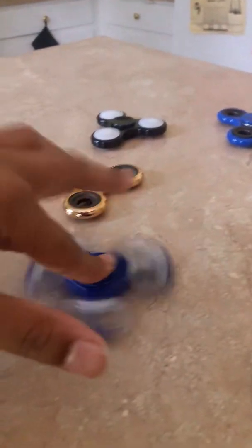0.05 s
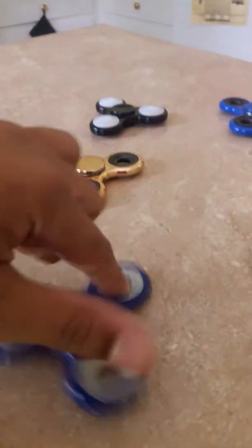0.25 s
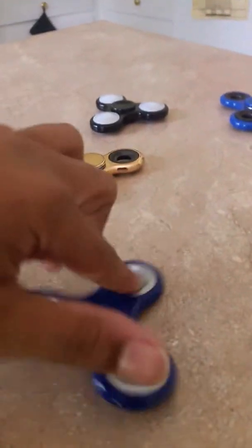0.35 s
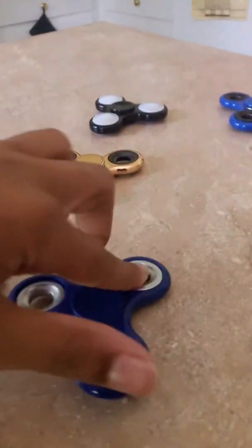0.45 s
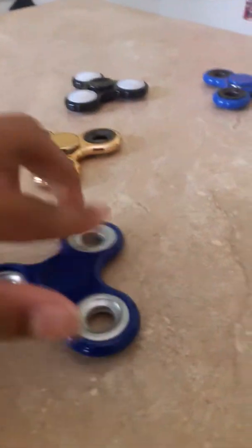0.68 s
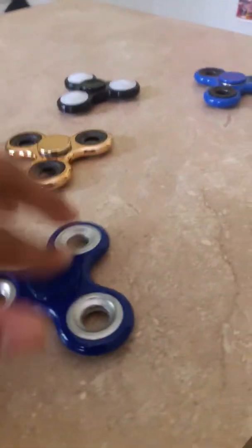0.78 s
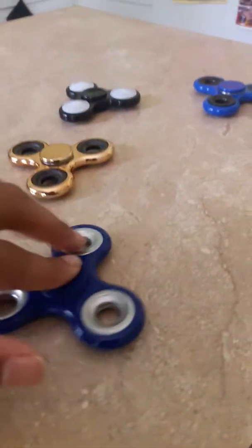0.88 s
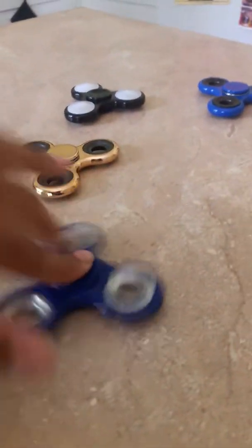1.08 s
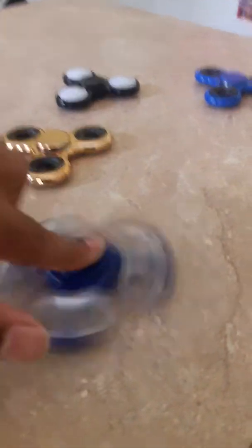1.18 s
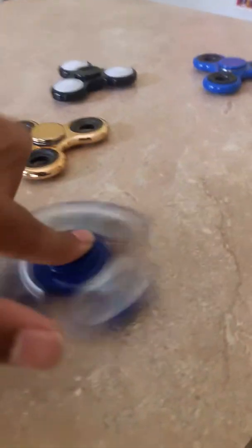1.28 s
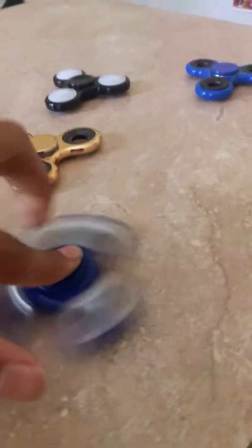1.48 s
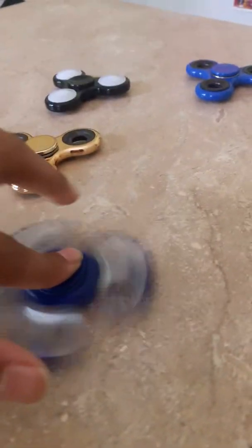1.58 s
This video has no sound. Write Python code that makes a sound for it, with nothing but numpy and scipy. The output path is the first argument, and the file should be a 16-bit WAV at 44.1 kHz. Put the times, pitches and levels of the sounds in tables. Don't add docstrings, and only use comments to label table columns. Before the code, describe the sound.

Close phone pickup in a small hard room: soft bearing whirr and table hum, a fast cluster of hard plastic and metal clacks, brief scrape, faint finger taps, near silence, then a quieter flick and renewed spinning.

```python
import sys
import numpy as np
from scipy import signal
from scipy.fft import rfft, irfft
from scipy.io import wavfile
from scipy.ndimage import uniform_filter1d

SR = 44100
rng = np.random.default_rng(int(sys.argv[2]) if len(sys.argv) > 2 else 0)


def output_pcm(signal):
    pcm = np.clip(np.atleast_2d(signal).T, -1, 1) * 32767
    wavfile.write(sys.argv[1], SR, np.round(pcm).astype(np.int16))


def invert_db(level):
    return 10 ** (np.asarray(level, dtype=float) / 20)


N = 72765

# start in seconds, plastic level in dB, table level in dB, steel level in dB,
# favoured mode in Hz.
STOP_CONTACTS = [(0.119, -43, -30.5, -41, 1000), (0.167, -35, -30.5, -48.5, 500),
                 (0.1772, -47.5, -44, -33.5, 450), (0.196, -31, -33, -55, 420),
                 (0.2057, -7, -27, -21.5, 1000), (0.2073, -9, -34.5, -19.5, 600),
                 (0.216, -18.5, -40, -30, 650), (0.224, -18, -43.5, -34.5, 600),
                 (0.236, -18, -50, -35, 450), (.247, -12, -18.5, -29.5, 500),
                 (0.2485, -16.5, -36.5, -23.5, 560), (0.253, -14.5, -30, -18, 2300),
                 (0.261, -14.5, -30.5, -26.5, 950), (0.2683, -7.5, -32.5, -21, 2300),
                 (0.2703, -17, -11.5, -10.5, 410), (0.276, -21, -29, -28, 1080),
                 (0.281, -21.5, -31.5, -28, 410), (0.288, -19, -23, -29, 410),
                 (0.295, -18, -12.5, -40.5, 2800), (.301, -35, -22, -46.5, 410),
                 (0.329, -28.5, -34.5, -32, 400), (0.346, -26.5, -39.5, -29, 900),
                 (0.445, -47, -47, -61, 1000), (0.479, -53, -69, -62, 2800)]
# start in seconds, plastic level in dB, table level in dB,
# steel level in dB, favoured mode in Hz.
FLICK_CONTACTS = [(0.6062, -41.5, -65, -74.5, 1067), (0.606, -36.5, -56, -79, 589.8),
                  (0.6155, -40.5, -54, -76, 1100), (0.635, -69, -56, -53, 1090),
                  (0.645, -61, -73, -57, 450), (0.6604, -34.5, -22, -33, 2010),
                  (0.681, -44, -25.5, -44, 1090), (0.6997, -50, -60, -56, 446),
                  (0.901, -62.5, -71, -62.5, 902), (1.171, -57.5, -22, -65, 434),
                  (1.179, -56, -19.5, -70.5, 450), (1.1908, -13.5, -42, -29.5, 2016),
                  (1.192, -13.5, -53, -32.5, 663), (1.199, -18, -40, -39, 930),
                  (1.2037, -18, -57, -26, 500), (1.209, -30, -59, -44, 2140),
                  (1.224, -25.5, -58, -31, 2400), (1.238, -28, -38, -35, 447), (1.2482, -21, -27, -36, 930),
                  (1.253, -25.5, -17, -45, 820), (1.27, -45, -24, -32.5, 450), (1.289, -33, -49, -51, 447),
                  (1.32, -39, -33, -58, 450), (1.37, -63, -49, -47, 450), (1.39, -60, -31, -46, 450)]
# frequency in Hz, level in dB, T60 in seconds.
TABLE_MODES = [(120, -4.5, 0.2), (184.7, -4, 0.047), (258, -7, 0.032), (284, 0, 0.16), (337.3, 10.5, 0.022)]
# frequency in Hz, level in dB, T60 in seconds.
PLASTIC_MODES = [(440, 0, 0.16), (466, -12, 0.077), (560, -9, .05), (630, 9, 0.032), (902, 3, 0.058),
                 (1120, -3, 0.02), (1090, 0, .04), (1302, -10.5, .03), (1420, -6.5, .035),
                 (1860, 14, 0.012), (2370, 5, 0.015), (2660, 8.5, 0.026), (3380, -10, 0.078),
                 (4340, 22.5, 0.0017)]
# frequency in Hz, level in dB, T60 in seconds.
GRIPPED_MODES = [(355, -2, 0.066), (410, 1.5, 0.046), (568, -4, 0.033), (688, 2.5, 0.017), (940, -8, 0.091),
                 (1036, 0, 0.034), (1090, -4.5, 0.026), (1370, -9.5, .03), (1536, 1.5, 0.039),
                 (1992, -1, .02), (2316, 0.5, 0.031), (2888, 2.5, .02), (3560, -2, 0.021),
                 (4350, 7.5, 0.0045)]
# frequency in Hz, level in dB, T60 in seconds.
PINNED_MODES = [(452, -1, 0.073), (500, -7, 0.12), (569, -3.5, 0.041), (667.5, 3.5, 0.055),
                (790, -29, 0.036), (931, 10, 0.034), (1098, 10.5, 0.022), (1224, -2.5, 0.074),
                (1515, -1.5, 0.045), (1942, 4, 0.031), (2170, 9, 0.013), (2400, 0, 0.023),
                (2840, 15.5, 0.0051), (3640, 13, 0.0034)]
# frequency in Hz, level in dB, T60 in seconds.
STEEL_MODES = [(4300, -13, .003), (5500, -12, .003), (6750, -2, .01), (7300, 0, .012), (7800, -1, .01),
               (8600, -4, .006), (9400, -7, .004), (10300, -10, .004), (11400, -13, .004),
               (12300, -14, .004), (13100, -7, .005), (14000, -6, .004), (14800, -5, .004),
               (15500, -4, .004)]
# frequency in Hz, level in dB, T60 in seconds.
WOBBLE_MODES = [(178.7, -6.5, 0.16), (237, -14.5, 0.086), (311, -2, 0.027), (466.6, -2, 0.026),
                (546.6, -7, 0.017), (907, -3, 0.028), (1096, -7, 0.03), (1250, -15.5, 0.025),
                (1820, -14.5, 0.017)]
# frequency in Hz, level in dB, T60 in seconds.
THUMP_MODES = [(69.5, -1.5, 0.57), (90, -4, 0.14)]
# time in seconds, level in dB.
BEARING_AND_RUB = [(0, -57), (.09, -59), (.19, -57), (.3, -50), (.45, -82), (.56, -105), (.68, -67.5),
                   (.82, -99.5), (.91, -91), (.96, -76), (1.01, -77.5), (1.07, -100), (1.13, -83),
                   (1.2, -52), (1.33, -53), (1.37, -57), (1.5, -58.5), (1.65, -54)]
# time in seconds, level in dB.
DRAG_LEVEL = [(0, -54), (.204, -73.5), (.212, -28), (.243, -31.5), (.29, -23.5), (.32, -34.5), (.36, -35.5),
              (.4, -46), (.47, -47.5), (.53, -66), (.62, -66), (.7, -64.5), (.8, -77), (1.13, -85),
              (1.188, -69), (1.2, -36), (1.33, -51.5), (1.48, -65)]
# time in seconds, level in dB.
WOBBLE_LEVEL = [(0, -47), (.1, -46), (.18, -44.5), (.215, -51.5), (.45, -59), (.64, -57), (.68, -49),
                (.79, -62), (.83, -70.5), (1.14, -63), (1.17, -45.5), (1.3, -40), (1.45, -46.5),
                (1.53, -47), (1.65, -41)]
# start in seconds, level in dB, frequency in Hz.
RING_CLICKS = [(0.47, -43, 5900), (.448, -55, 5100), (.447, -55.5, 14000), (0.634, -53, 7400),
               (0.68, -56, 10000), (.6605, -50, 5300), (.682, -50, 14000), (.688, -52, 14300),
               (1.181, -55, 6000), (1.249, -44, 14200), (1.298, -35, 13000), (1.5, -39, 14300),
               (1.1945, -25, 6300), (1.311, -48, 16000)]
# start in seconds, level in dB.
HAND_THUMPS = [
    (.21, -41.5),
    (0.302, -49),
    (.35, -45.5),
    (1.225, -45.5),
]
# frequency in Hz, T60 in seconds.
ROOM_T60 = [(100, 0.28), (400, 0.31), (1000, 0.13), (3000, 0.45), (8000, 0.24), (15000, 0.15)]
# frequency in Hz, correlation from 0 to 1.
LIKENESS = [(60, .97), (300, .96), (700, .85), (1500, .6), (4000, .15)]
# frequency in Hz, level in dB.
FLOOR_SPECTRUM = [(25, -52), (60, -6.5), (150, 9), (350, -0.5), (700, -7), (1500, -15), (4000, -32),
                  (16000, -40)]

FLOOR_DB = -61.5
BODY_WET_DB, STEEL_WET_DB, ROOM_GAP_S = -9.5, -11, 0.0038
LEFT_DB, LEFT_LAG_S = 1.38, 0.00011
DETUNE, SCATTER_DB, SIDE_CHANGE = 0.0094, 1, 0.62
CLICK_T60_S, CLICK_SPREAD, THUMP_S = 0.01, 0.093, 0.0094
WOBBLE_PER_S, WOBBLE_SPREAD_DB = 700, 2.5
DRAG_PER_S, DRAG_SPREAD_DB, DRAG_DULL_HZ, DRAG_RING = 2000, 3, 4040, 0.51
RATTLE_PER_S, RATTLE_DB, RATTLE_SPREAD_DB, RATTLE_RING = 2100, -14.5, 1.6, 0.4
SLIDE_START_S, SLIDE_LENGTH_S, SLIDE_DB = 0.3956, 0.1, -45.5
BALLS_PER_S, BALL_SPREAD_DB, FLICKER_DB = 1200, 1.5, 0.8
TOP_DB, TOP_GROWTH = -4.5, 1.9
STRIKE_S, SOFTEN, THUD_S, HARD_DB = 0.0002, 0.3, 0.0015, -28
FAVOUR_DB, FAVOUR_OCTAVES = 11, 0.39
JINGLE_S, FIRST_TICK, CRACK_DB = 0.001, 10, -5
PLASTIC_HIGHPASS = signal.butter(2, 250, "high", fs=SR, output="sos")
RACE_HIGHPASS = signal.butter(4, 6000, "high", fs=SR, output="sos")


def unit_rms(x):
    return x / np.sqrt(np.mean(x ** 2) + 1e-20)


def read(points, hz):
    f, value = np.transpose(points)
    return np.interp(np.log(hz + 1), np.log(f + 1), value)


def gain_curve(points):
    s, db = np.transpose(points)
    return invert_db(np.interp(np.arange(N) / SR, s, db))


def add(mix, start_s, sound):
    part = mix[:, round(start_s * SR):][:, :sound.shape[1]]
    part += sound[:, :part.shape[1]]


def force_pulse(t, length_s):
    push = np.sin(np.pi * np.minimum(t / length_s, 1)) ** 2
    return push / push.sum()


def mode_chance():
    return rng.standard_normal((4, 14))


def ring(modes, chance, longer=1):
    t = np.arange(4000) / SR
    hz, db, t60 = np.transpose(modes)[:, :, None]
    detune, scatter, polarity, side = chance[:, :len(modes), None]
    sign = np.where(polarity + 0.6 > 0, -1, 1)
    likeness = np.clip(read(LIKENESS, hz), -1, 1)
    turn = SIDE_CHANGE * np.pi * np.sqrt(1 - likeness ** 2) * side
    fade = sign * invert_db(db + SCATTER_DB * scatter - 60 * t / (t60 * longer))
    angle = 2 * np.pi * hz * (1 + DETUNE * detune) * t
    onset = np.minimum(t * hz * 2, 1)
    left = (fade * np.sin(angle)).sum(0)
    right = (fade * np.sin(angle + turn * onset)).sum(0)
    taper = np.cos(t / t[-1] * np.pi / 2)
    return np.array([left, right]) * taper / np.sqrt((invert_db(db) ** 2).sum())


def grains(modes, per_s, spread_db, longer=1):
    size = invert_db(spread_db * np.minimum(rng.exponential(1, N), 5))
    size = size * (rng.random(N) < per_s / SR) * rng.choice([-1, 1], N)
    version = rng.integers(0, 4, N)
    out = np.zeros((2, N))
    for k in range(4):
        ticks = (size * (version == k))[None]
        out += signal.oaconvolve(ticks, ring(modes, mode_chance(), longer))[:, :N]
    return unit_rms(out)


def noise_spectra(size):
    hz = np.fft.rfftfreq(512, 1 / SR)
    a, b, c, d = rng.standard_normal((size // 128 + 5, 257, 4)).T
    same = np.clip(read(LIKENESS, hz), -1, 1)[:, None]
    left = a + 1j * b
    right = same * left + np.sqrt(1 - same ** 2) * (c + 1j * d)
    return hz, np.array([left, right])


def floor():
    hz, z = noise_spectra(N)
    shaped = z * invert_db(read(FLOOR_SPECTRUM, hz))[:, None]
    noise = signal.istft(shaped, nperseg=512, noverlap=384)[1][:, :N]
    return invert_db(FLOOR_DB) * unit_rms(noise)


def room(x):
    hz, z = noise_spectra(SR)
    t = np.arange(z.shape[2]) * 128 / SR
    decay = invert_db(-60 * t / read(ROOM_T60, hz)[:, None])
    tail = signal.istft(z * decay, nperseg=512, noverlap=384)[1]
    tail = tail * np.clip(np.arange(tail.shape[1]) / SR / ROOM_GAP_S - 1, 0, 1)
    return signal.fftconvolve(x[:1], tail / np.linalg.norm(tail[0]), axes=1)[:, :N]


def clicks_and_thumps():
    out = np.zeros((2, N))
    t = np.arange(400)[None] / SR
    for start_s, db, hz in RING_CLICKS:
        group = [(hz * (1 + CLICK_SPREAD * k), 0, CLICK_T60_S) for k in (-1, 0, 1)]
        add(out, start_s, invert_db(db) * ring(group, mode_chance()))
    push = force_pulse(t, min(THUMP_S, t.max()))
    thump = signal.oaconvolve(ring(THUMP_MODES, np.zeros((4, 14))), push)
    for start_s, db in HAND_THUMPS:
        add(out, start_s, invert_db(db) * thump)
    return signal.sosfilt(signal.butter(2, 55, "high", fs=SR, output="sos"), out)


def wobble():
    return gain_curve(WOBBLE_LEVEL) * grains(WOBBLE_MODES, WOBBLE_PER_S, WOBBLE_SPREAD_DB)


def drag():
    dull = [(hz, db - 20 * np.log10(1 + (hz / DRAG_DULL_HZ) ** 2), t60) for hz, db, t60 in PLASTIC_MODES]
    slips = signal.sosfilt(PLASTIC_HIGHPASS, grains(dull, DRAG_PER_S, DRAG_SPREAD_DB, DRAG_RING))
    rattle = invert_db(RATTLE_DB) * grains(STEEL_MODES, RATTLE_PER_S, RATTLE_SPREAD_DB, RATTLE_RING)
    progress = np.clip((np.arange(N) / SR - SLIDE_START_S) / SLIDE_LENGTH_S, 0, 1)
    stroke = abs(np.sin(np.pi * progress)) ** 0.5
    slide = invert_db(SLIDE_DB) * stroke * grains(PLASTIC_MODES[4:7], DRAG_PER_S, DRAG_SPREAD_DB)
    return gain_curve(DRAG_LEVEL) * (slips + rattle) + slide


def bearing():
    drift = uniform_filter1d(uniform_filter1d(rng.standard_normal(N), size=900), size=500)
    effort = gain_curve(BEARING_AND_RUB) * invert_db(FLICKER_DB * unit_rms(drift))
    top = invert_db(TOP_DB - 64.5) * (effort / invert_db(-59.5)) ** TOP_GROWTH
    low_ticks = effort * grains(STEEL_MODES[2:6], BALLS_PER_S, BALL_SPREAD_DB)
    high_ticks = top * grains(STEEL_MODES[6:], BALLS_PER_S, BALL_SPREAD_DB)
    return signal.sosfilt(RACE_HIGHPASS, low_ticks + high_ticks)


def favour(modes, place_hz):
    struck = []
    for hz, db, t60 in modes:
        octaves = np.log2(hz / place_hz)
        struck.append((hz, db + FAVOUR_DB * np.exp(-(octaves / FAVOUR_OCTAVES) ** 2), t60))
    return struck


def contacts():
    body, steel = np.zeros((2, N)), np.zeros((2, N))
    t = np.arange(400)[None] / SR
    crack = np.array([[-1, -0.6, 1, 0.6], [-0.6, -1, 0.6, 1]])
    events = [(GRIPPED_MODES, row) for row in STOP_CONTACTS]
    events += [(PINNED_MODES, row) for row in FLICK_CONTACTS]
    for modes, (start_s, plastic_db, table_db, steel_db, place_hz) in events:
        plastic_chance, table_chance, steel_chance = mode_chance(), mode_chance(), mode_chance()
        table_chance[2] = -1
        if plastic_db > HARD_DB:
            plastic_chance[2] = 1
        strike_s = min(STRIKE_S * invert_db(-SOFTEN * (plastic_db + 10)), THUD_S)
        plastic = signal.sosfilt(PLASTIC_HIGHPASS, ring(favour(modes, place_hz), plastic_chance))
        plastic = signal.oaconvolve(plastic, force_pulse(t, strike_s))
        thud = signal.oaconvolve(ring(TABLE_MODES, table_chance), force_pulse(t, THUD_S))
        shake = (rng.standard_normal(400) ** 3 + FIRST_TICK * (t == 0)) * np.exp(-t / JINGLE_S)
        jingle = signal.oaconvolve(ring(STEEL_MODES, steel_chance), shake / np.linalg.norm(shake))
        add(body, start_s, invert_db(plastic_db) * plastic)
        add(body, start_s, invert_db(table_db - 11.5) * thud)
        add(steel, start_s, invert_db(steel_db) * jingle)
        add(steel, start_s, invert_db(steel_db + CRACK_DB) * crack)
    return body, steel


def scene():
    body, steel = contacts()
    body = body + drag() + wobble()
    steel = steel + bearing()
    balance = invert_db([[LEFT_DB], [-LEFT_DB]])
    lag = np.exp(-2j * np.pi * np.fft.rfftfreq(N, 1 / SR) * [[LEFT_LAG_S], [0]])
    direct = irfft(rfft(body + steel) * lag, N)
    near = direct + room(invert_db(BODY_WET_DB) * body + invert_db(STEEL_WET_DB) * steel)
    near = signal.sosfilt(signal.butter(6, 105, "high", fs=SR, output="sos"), near * balance)
    return near + floor() + clicks_and_thumps() * balance


def low_pass(x):
    return signal.sosfilt(signal.butter(12, 16980, fs=SR, output="sos"), x)


def record(dry):
    band_limit = signal.firwin(301, 15850, window=("kaiser", 9), fs=SR)
    mix = signal.oaconvolve(dry, band_limit[None], "same") - 0.0006
    return low_pass(mix)


dry = scene()
out = record(dry)
output_pcm(out)
```